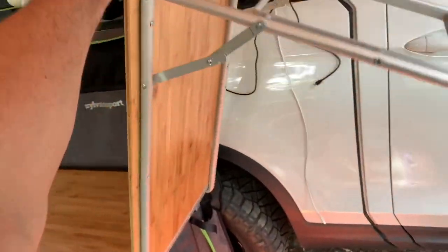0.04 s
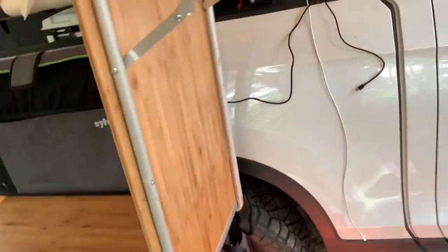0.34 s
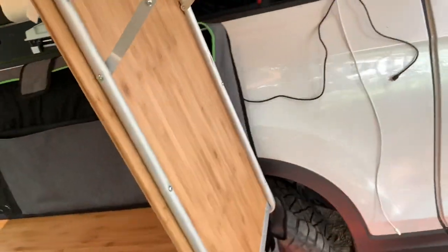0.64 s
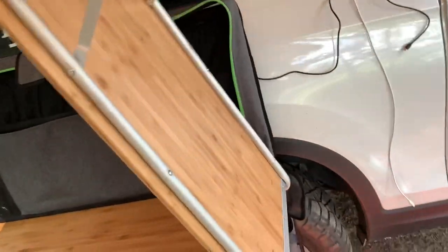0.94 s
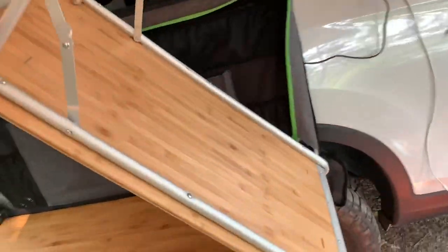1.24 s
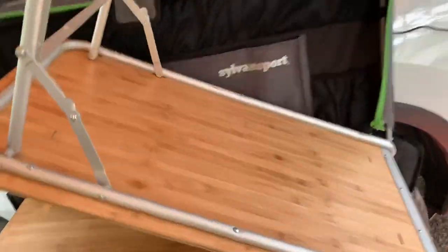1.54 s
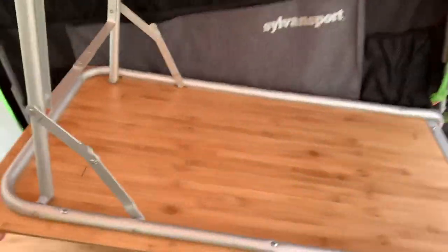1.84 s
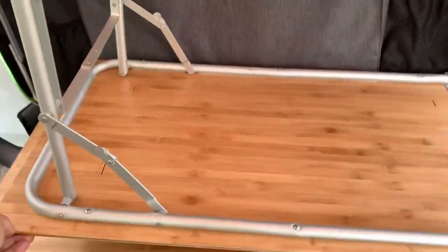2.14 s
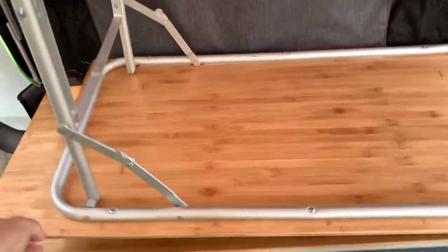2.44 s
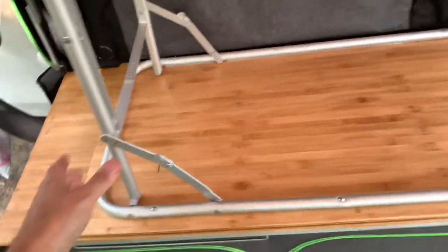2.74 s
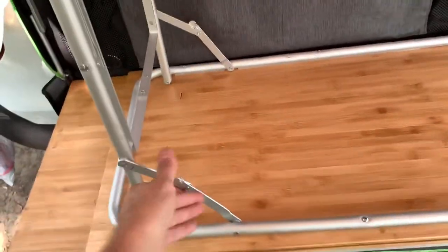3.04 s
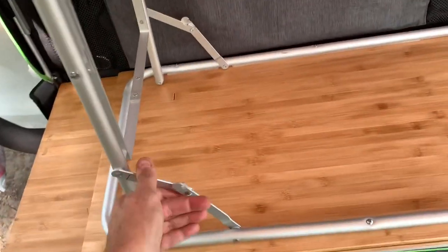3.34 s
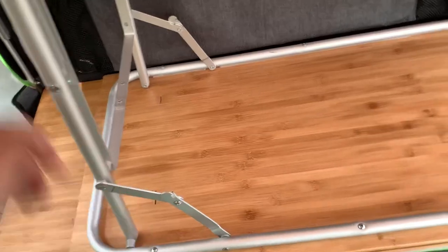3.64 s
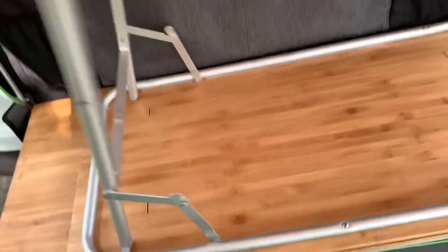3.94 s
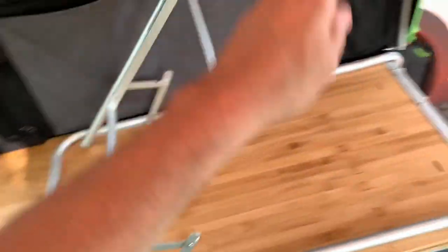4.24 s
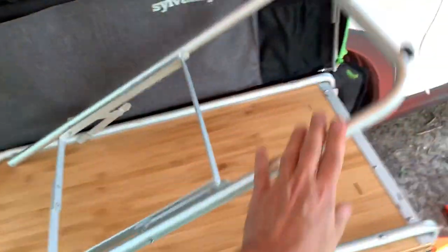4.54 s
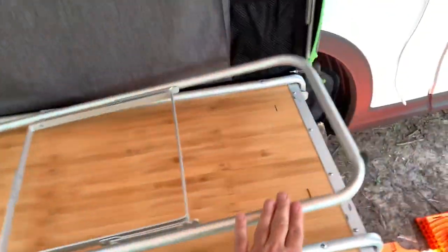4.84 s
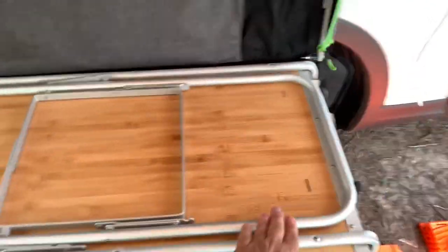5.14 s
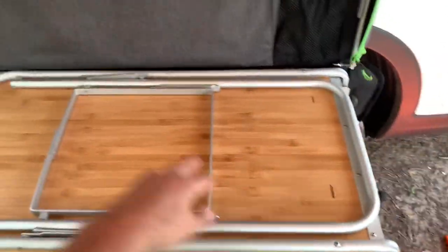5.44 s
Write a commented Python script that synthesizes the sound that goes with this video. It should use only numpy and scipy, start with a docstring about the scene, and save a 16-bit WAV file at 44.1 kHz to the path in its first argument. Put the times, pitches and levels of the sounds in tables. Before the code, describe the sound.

A wooden folding table bumps, scrapes and drops with a thud, then its metal legs clack shut, over faint trilling insects.

```python
"""Outdoors, insects trilling: a bamboo camp table with aluminium legs is tipped, slid and folded.
Its edge bumps, then scrapes and judders over another table, with a brief stick-slip squeal.
The top drops with a thud of damped wood modes. Braces click, ringing the frame;
the legs swing down and slam shut in a burst of contacts. A faint low hum follows."""
import sys
import numpy as np
from scipy import signal
from scipy.fft import rfft, irfft, next_fast_len
from scipy.io import wavfile
from scipy.ndimage import uniform_filter1d

SR = 44100
rng = np.random.default_rng(int(sys.argv[2]) if len(sys.argv) > 2 else 0)


def waveform_to_disk(signal):
    """Save audio, clipped to [-1, 1], as 16-bit WAV at the path in sys.argv[1]."""
    frames = np.transpose(np.atleast_2d(signal))
    scaled = np.clip(frames, -1, 1) * 32767
    samples = np.round(scaled).astype(np.int16)
    wavfile.write(sys.argv[1], SR, samples)


N = 246519

# noise spectra (frequency [Hz], relative density [dB])
CHORUS_SPECTRUM = [(4000, -55), (6300, -30), (7400, 0), (7950, -1), (8500, -22), (15500, -17)]
RUMBLE_SPECTRUM = [(20, -29), (48, 0), (85, 3.5), (130, -6), (210, -12.5), (700, -72)]
GRIND_SPECTRUM = [(80, -3.5), (230, 3.5), (450, -3.5), (1100, -2), (2100, -2.5), (3200, -11.5), (5000, -10),
                  (12000, -12)]
HISS_SPECTRUM = [(1500, -11), (4000, 0.5), (5600, -4), (10000, 4), (15300, 1.5)]
TICK_SPECTRUM = [(500, -17.5), (3000, -3.5), (8000, -5.5), (9800, 2.5), (14500, -8)]
# stereo width (frequency [Hz], side over mid [dB])
WIDTH = [(250, -13), (1000, -4), (2000, -1), (7900, 0), (8900, 16), (10000, 1), (12200, 3), (13500, 22),
         (15000, 3)]
# modes of aluminium frame, hollow edge rail (frequency [Hz], level [dB])
FRAME_MODES = [(440, -8), (716, -7.5), (969, -4.5), (1114, 0), (1244, -3), (1384, -3), (1620, -5),
               (1884, 1), (2200, -11), (2498, -0.5), (2901, -0.5), (2975, 2.5), (4360, 4.5), (5100, 1),
               (6385, 6)]
RAIL_MODES = [(1061, -7.5), (1577, 2.5), (1997, -1), (2466, -4.5), (3450, -3)]
# modes of the bamboo top (frequency [Hz], level [dB], t60 [s])
BOARD_MODES = [(52, -6, 0.2), (79, 6, .2), (156, -25, 1), (232.8, 4.5, 0.21), (339, -5.5, 0.051),
               (399, 1.5, 0.12), (502, -7, 0.13)]
# partials of a stick-slip squeal (frequency [Hz], level [dB])
SQUEAL_PARTIALS = [(387.6, -49.5), (581, -60), (969.0, -54.5), (1570, -58), (2126, -60), (3063, -63),
                   (3695, -54.5)]
# grip shifts (time [s], level [dB])
SWAYS = [(2.14, -44), (2.23, -41), (3.031, -43.5), (3.29, -43), (3.84, -41.5), (4.159, -45), (4.56, -49),
         (4.68, -48.5)]
# hand, leg and fabric rubs (start [s], attack [s], hold [s], grind [dB], hiss [dB])
RUBS = [(0, 0.0017, 0.32, -63.5, -75), (0.079, 0.027, 0.015, -53.5, -48.5), (0.42, 0.11, 0.04, -46.5, -47),
        (0.69, 0.03, 0.0083, -45.5, -46), (1.19, 0.014, 0.18, -48.5, -45.5),
        (2.337, 0.066, 0.07, -42.5, -39), (2.509, .01, 0.017, -41.5, -62.5),
        (2.659, 0.0069, 0.0021, -48.5, -43), (3.39, .04, 0.063, -66.5, -76),
        (3.766, 0.018, 0.017, -59.5, -52.5), (4.085, 0.016, 0.015, -71.5, -66),
        (4.335, 0.033, 0.13, -63.5, -49.5), (4.782, .006, 0.14, -79, -48),
        (5.092, 0.043, 0.079, -60.5, -61), (5.489, 0.037, 0.048, -55.5, -57.5)]
# long drag, before trims (time [s], grind [dB], hiss [dB])
DRAG = [(0.74, -47, -62), (0.968, -51, -52), (1.182, -53, -57), (1.29, -64, -52), (1.44, -50, -83),
        (1.592, -50.5, -60), (2.084, -48, -58.5), (2.49, -44, -54)]
# stick-slip runs (start [s], end [s], slip rate [1/s], level [dB])
JUDDERS = [(0.486, 0.596, 210, -48), (2.371, 2.505, 130, -41)]
# squeaks, groans, last a low hum (start [s], end [s], start pitch [Hz], end pitch [Hz], level [dB])
SQUEAKS_AND_HUM = [(1.23, 1.43, 2600, 2740, -53), (1.5, 2.1, 275, 262, -58),
                   (1.595, 1.635, 1480, 1530, -47), (2.41, 2.455, 290, 500, -39),
                   (5.14, 5.5, 154, 154, -60)]
# blows to the top (time [s], level [dB], push length [s])
THUMPS = [(0.527, -48, 0.001), (2.515, -18, 0.00089), (2.519, -16, 0.0055), (3.241, -46.5, 0.0014),
          (3.802, -41.5, 0.00032), (4.877, -38.5, 0.0066), (4.925, -33, 0.0065)]
# metal contacts (time [s], level [dB], ring centre [Hz], tick over ring [dB])
KNOCKS = [(0.09, -43.5, 955, -2), (0.206, -47, 2020, -23), (0.497, -46, 1390, -20), (0.664, -38, 815, -40),
          (0.723, -44, 1700, -8), (0.799, -33.5, 1120, -30), (1.218, -34.5, 670, 1),
          (1.551, -45, 1090, -20), (2.376, -36, 560, -11), (2.439, -29, 467, -8), (2.461, -28, 420, -21),
          (2.508, -13, 3170, 1), (2.511, -22, 1460, -17.5), (2.556, -29, 2050, 6), (2.662, -42, 629, -37),
          (2.684, -34, 624, 3), (2.995, -57, 650, -20), (3.238, -48, 900, -29), (3.422, -57, 1300, -17),
          (3.471, -53, 1300, -13), (3.802, -49, 700, -16), (3.911, -50.5, 800, -25),
          (4.038, -50.5, 580, -6), (4.346, -47, 1500, -21), (4.36, -37.5, 840, -3.5),
          (4.65, -43.5, 1220, -13), (4.9212, -9.5, 4330, 1), (4.941, -27, 2000, 16),
          (5.112, -41.5, 4950, 11), (5.564, -38, 845, 4.5)]
# edge rebounding, legs slamming shut (time [s], level [dB], brightness [Hz])
EDGE_BUMP = [(1.121, -26, 6700), (1.1374, -26.5, 3170)]
LEG_SLAM = [(4.9035, -30.5, 1785), (4.9107, -16.5, 1636), (4.9179, -16.5, 7000), (4.9251, -21.5, 6000)]

TOP_HZ = 15900
ATTACK_CYCLES = .6  # rise constant of a metal contact


def undb(db):
    """Decibels to gain."""
    return 10 ** (np.asarray(db) / 20)


def unit(x):
    """Scale to rms 1."""
    return x / np.sqrt(np.mean(x ** 2) + 1e-18)


def unit_head(x, length_s):
    """Scale to rms 1 over the onset."""
    return x / np.sqrt(np.mean(x[:, :int(length_s * SR)] ** 2))


def gain_at(hz, spectrum):
    """Spectrum gain, interpolated in log frequency."""
    f, db = np.transpose(spectrum)
    return undb(np.interp(np.log(hz + 1), np.log(f), db))


def colour(x, shape):
    """Filter by a gain function of frequency."""
    size = next_fast_len(x.shape[-1])
    return irfft(rfft(x, size) * shape(np.fft.rfftfreq(size, 1 / SR)), size)[..., :x.shape[-1]]


def stereo(pair, spectrum):
    """Two unrelated signals to left and right: alike in the bass, unlike in the treble."""
    mid, side = colour(pair, lambda f: gain_at(f, spectrum) / np.hypot(1, gain_at(f, WIDTH)))
    side = colour(side, lambda f: gain_at(f, WIDTH))
    return np.array([mid + side, mid - side]) / np.sqrt(np.mean(mid ** 2))


def noise(spectrum, size=N):
    """Shaped stereo noise."""
    return stereo(rng.standard_normal((2, size)), spectrum)


def walk(rate_hz):
    """Random wander, rms 1."""
    k = int(SR / rate_hz)
    return unit(uniform_filter1d(np.repeat(rng.standard_normal(N // k + 1), k), k)[:N])


def fade(t, t60_s):
    """Free decay."""
    return np.exp(-np.log(1000) * t / t60_s)


def mode(hz, t, phase=0):
    """Stereo sine; left and right differ more in phase at higher pitch."""
    apart = min(hz / 1800, 1) * rng.uniform(.6, 1.1) * rng.choice([-1, 1])
    return np.sin(2 * np.pi * hz * t + phase + np.array([[apart], [-apart]]))


def lowpass(x, hz):
    """Second-order low-pass, cutoff capped at TOP_HZ."""
    return signal.lfilter(*signal.butter(2, min(hz, TOP_HZ), fs=SR), x)


def add(out, start_s, x):
    """Mix x into out."""
    i = int(start_s * SR)
    out[:, i:i + x.shape[1]] += x[:, :N - i]


def insects(chorus_db=-60, near_rel_db=-3, pulse_hz=22.76, high_hz=8080, low_hz=7450):
    """Steady chorus; one near insect drops in pitch with each wing stroke."""
    stroke = np.cumsum(pulse_hz * (1 + 0.0074 * walk(4))) / SR % 1
    hz = high_hz + (low_hz - high_hz) * stroke ** 2 + 70 * walk(890)
    trill = np.sin(np.pi * stroke) ** 2 * np.sin(2 * np.pi * np.cumsum(hz) / SR)
    near = unit(trill) * undb(near_rel_db + 2 * walk(5))
    return undb(chorus_db) * (noise(CHORUS_SPECTRUM) + np.array([near, np.roll(near, 1)]))


def sway(rise_s=0.038, fall_s=0.053, rest_db=-58.5):
    """The top rumbles in the hands, swelling at each grip shift."""
    t = np.arange(N) / SR
    swells = sum(undb(db) * np.exp(-((t - s) / np.where(t < s, rise_s, fall_s)) ** 2) for s, db in SWAYS)
    return noise(RUMBLE_SPECTRUM) * np.hypot(swells, undb(rest_db))


def wavering_tone(start_s, end_s, hz, end_hz, db, waver, flutter_db=3):
    """A tone that swells, glides and dies. Waver is a share of the pitch."""
    t = np.arange(N) / SR
    progress = np.clip((t - start_s) / (end_s - start_s), 0, 1)
    swell = np.sqrt(np.abs(np.sin(np.pi * progress)))
    drift = 2 * np.pi * np.cumsum((end_hz - hz) * progress + hz * waver * walk(160)) / SR
    return np.sqrt(2) * undb(db + flutter_db * walk(50)) * swell * mode(hz, t, drift)


def squeal(start_s=1.212, end_s=1.446):
    """Partials of a brief stick-slip squeal as the table slides."""
    return sum(wavering_tone(start_s, end_s, hz, hz, db, waver=0.004) for hz, db in SQUEAL_PARTIALS)


def squeaks_and_hum():
    """Squeaks and groans, and a faint steady low hum after the slam."""
    return sum(wavering_tone(*row, waver=0.0209) for row in SQUEAKS_AND_HUM)


def judder(jitter=.18, scatter_db=4, slip_t60_s=.02):
    """Uneven stick-slip of the edge; each slip is a damped knock in the wood."""
    out, t = np.zeros((2, N)), np.arange(SR // 20) / SR
    for start_s, end_s, rate_hz, db in JUDDERS:
        train, s = np.zeros((2, N)), start_s
        wood = noise(GRIND_SPECTRUM, len(t)) * fade(t, slip_t60_s)
        while s < end_s:
            swell = np.sqrt(np.sin(np.pi * (s - start_s) / (end_s - start_s)))
            add(train, s, wood * swell * undb(scatter_db * rng.standard_normal()))
            s += np.exp(jitter * rng.standard_normal()) / rate_hz
        out += undb(db) * unit(train) * np.sqrt((end_s - start_s) * SR / N)
    return out


def movement(start_s, attack_s, hold_s, release_db_per_s):
    """Attack-hold-release gain."""
    t = np.arange(N) / SR - start_s
    return np.clip(t / attack_s, 0, 1) * undb(-release_db_per_s * np.maximum(t - attack_s - hold_s, 0))


def drag_gains(grind_trim_db=-2, hiss_trim_db=7.5, rise_s=0.066):
    """Grind and hiss gains of the drag; it grinds hardest just before the drop."""
    t = np.arange(N) / SR
    s, grind_db, hiss_db = np.transpose(DRAG)
    gains = undb([np.interp(t, s, grind_db) + grind_trim_db, np.interp(t, s, hiss_db) + hiss_trim_db])
    return gains * movement(s[0], rise_s, s[-1] - s[0] - rise_s, release_db_per_s=185)


def rub_gains(rest_grind_db=-70.5, rest_hiss_db=-76.5, wander_db=3):
    """Grind and hiss gains of short rubs over faint handling."""
    gains = undb([[rest_grind_db], [rest_hiss_db]]) * undb(wander_db * walk(8))
    for s, attack_s, hold_s, grind_db, hiss_db in RUBS:
        envelope = movement(s, attack_s, hold_s, release_db_per_s=160.5)
        gains = np.hypot(gains, undb([[grind_db], [hiss_db]]) * envelope)
    return gains


def snags(rate_hz=130, t60_s=.028, detune=.07, scatter_db=13):
    """Random edge snags, each ringing three top or frame modes, shifted by where it bears."""
    out, t = np.zeros((2, N)), np.arange(SR // 10) / SR
    pitches_hz = [row[0] for row in BOARD_MODES + FRAME_MODES if 200 < row[0] < 4500]
    for when, size, shift in rng.random((int(rate_hz * N / SR), 3)):
        ring = sum(mode(hz * (1 + detune * (2 * shift - 1)), t) for hz in rng.choice(pitches_hz, size=3))
        add(out, when * N / SR, undb(scatter_db * size ** 2) * ring * fade(t, t60_s))
    return unit(out)


def tube_echoes(x, trip_s=.003, travel=.06, gain=.55, count=4):
    """Friction noise returns from the tube ends; delays drift as the contact slides."""
    i, echoes = np.arange(N), np.zeros((2, N))
    for k in range(count):
        delay = trip_s * SR * rng.uniform(0.5023, 2)
        drift = 1 + travel * uniform_filter1d(walk(2), SR // 2)
        echoes += (-1) ** k * np.array([np.interp(i - delay * drift, i, side) for side in x])
    return (x + gain * echoes) / np.sqrt(1 + count * gain ** 2)


def frame_response(f, share=0.44, rel_width=0.0012):
    """Unity gain plus a narrow peak per frame mode."""
    return 1 + share * sum(undb(db) / (1 + ((f / hz - 1) / rel_width) ** 2) for hz, db in FRAME_MODES)


def scrape(grain_db=0.5, uneven_db=2, snag_rel_db=-5, grit_db=3, dull_hz=8200):
    """Tiny edge slips grind through top and frame while fabric rustles, under uneven pressure."""
    drag_grind, drag_hiss = drag_gains()
    rub_grind, rub_hiss = rub_gains()
    pressure_db = uneven_db * np.tanh(walk(45))
    slips = rng.standard_normal((2, N)) * (rng.random(N) < .2)
    slips *= undb(grain_db * np.minimum(rng.exponential(size=N), 3))
    grind = stereo(colour(slips, frame_response), GRIND_SPECTRUM) + undb(snag_rel_db) * snags()
    grind *= np.hypot(drag_grind, rub_grind)
    hiss = noise(HISS_SPECTRUM) * rub_hiss
    # wood on wood is duller than skin or fabric
    hiss += colour(noise(HISS_SPECTRUM), lambda f: 1 / np.hypot(1, f / dull_hz)) * drag_hiss
    grit = unit(undb(grit_db * walk(500)))
    return tube_echoes(grind * undb(pressure_db) + hiss * grit * undb(pressure_db / 2))


def thumps(radiate_hz=38, thud_rel_db=-6, thud_t60_s=0.24):
    """The top thuds: a few clear modes among many damped ones; a long push reaches only the lowest."""
    out, t = np.zeros((2, N)), np.arange(SR) / SR
    for s, db, push_s in THUMPS:
        ring = sum((-1) ** k * undb(mode_db) * mode(hz, t) * fade(t, t60_s)
                   for k, (hz, mode_db, t60_s) in enumerate(BOARD_MODES))
        thud = noise([(140, -2), (380, -4), (650, -7.5), (2000, -29)], len(t)) * fade(t, thud_t60_s)
        push = np.sin(np.pi * np.minimum(t / push_s, 1)) ** 2
        blow = signal.fftconvolve(ring + undb(thud_rel_db) * thud, push[None])[:, :len(t)]
        add(out, s, undb(db) * unit_head(blow, 0.041))
    # the slowest motion does not radiate
    return signal.sosfilt(signal.butter(2, radiate_hz, "highpass", fs=SR, output="sos"), out)


def frame_ring(t, t60_1khz_s, scatter_db=3, detune=.005):
    """Each contact point favours other frame modes; high modes die first."""
    ring = np.zeros((2, len(t)))
    draws = rng.uniform(-1.02, 1, (len(FRAME_MODES), 3))
    for (hz, db), (size, shift, phase) in zip(FRAME_MODES, draws):
        tone = mode(hz * (1 + detune * shift), t, np.pi * phase)
        ring += undb(db + scatter_db * size) * tone * fade(t, t60_1khz_s * (1000 / hz) ** .25)
    return ring


def knocks(t60_1khz_s=.085, buzz_rel_db=-2, band_ratio=1.61, tick_t60_s=0.098):
    """Contacts ring the frame and buzz its loose joints; harder ones are higher, sharper, shorter."""
    out, t = np.zeros((2, N)), np.arange(SR // 2) / SR
    buzz_tail = undb(-36) * fade(t, t60_s=0.52)
    for s, db, centre_hz, tick_db in KNOCKS:
        t60_s = t60_1khz_s * (1000 / centre_hz) ** 0.53
        modes = frame_ring(t, t60_s)
        buzz = noise([(100, -8.5), (1000, -20), (16000, -26)], len(t)) * (fade(t, t60_s) + buzz_tail)
        ring = unit_head(modes, 0.00064) + undb(buzz_rel_db) * unit_head(buzz, 0.014)
        band_hz = [centre_hz / band_ratio, centre_hz * band_ratio]
        ring = signal.lfilter(*signal.butter(1, band_hz, "bandpass", fs=SR), ring)
        ring = unit_head(lowpass(ring, 3 * centre_hz), 0.0054)
        tick = unit_head(noise(TICK_SPECTRUM, len(t)) * fade(t, min(tick_t60_s, t60_s)), 0.0024)
        attack = 1 - np.exp(-t * centre_hz / ATTACK_CYCLES)
        add(out, s, undb(db) * unit_head((ring + undb(tick_db) * tick) * attack, 0.0035))
    return out


def clang(modes, contacts, t60_s, buzz_rel_db):
    """A metal part strikes in quick succession; harder contacts reach higher modes, joints buzz."""
    out, t = np.zeros((2, N)), np.arange(SR // 2) / SR
    ring = unit(sum((-1) ** k * undb(db) * mode(hz, t) for k, (hz, db) in enumerate(modes)))
    decay = fade(t, t60_s) + undb(-42) * fade(t, t60_s=.7)  # the frame hums on faintly
    for s, db, bright_hz in contacts:
        buzz = undb(buzz_rel_db) * noise([(200, -15.5), (900, 0), (12000, -9)], len(t))
        blow = lowpass((ring + buzz) * decay, bright_hz)
        attack = 1 - np.exp(-t * bright_hz / ATTACK_CYCLES)
        add(out, s, undb(db) * unit_head(blow * attack, 0.0086))
    return out


def scene(right_over_left_db=1):
    """The table, slightly right, over the insects."""
    metal = knocks()
    metal += clang(FRAME_MODES, LEG_SLAM, t60_s=0.069, buzz_rel_db=-1.5)
    metal += clang(RAIL_MODES, EDGE_BUMP, t60_s=0.058, buzz_rel_db=-3.5)
    table = metal + thumps() + scrape() + judder() + squeal() + squeaks_and_hum() + sway()
    pan = undb([[-right_over_left_db / 2], [right_over_left_db / 2]])
    return table * pan + insects()


def record(dry):
    """Soft peak limiting, then a steep low-pass."""
    limited = .78 * np.tanh(dry / .78)
    return signal.sosfilt(signal.ellip(10, .2, 80, TOP_HZ, fs=SR, output="sos"), limited)


dry = scene()
out = record(dry)
waveform_to_disk(out)
```